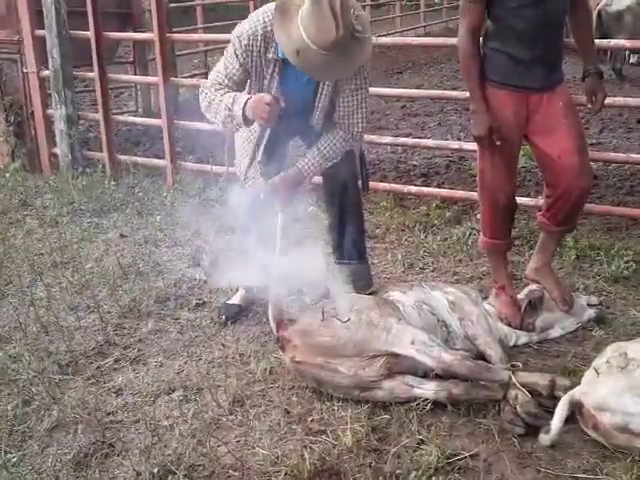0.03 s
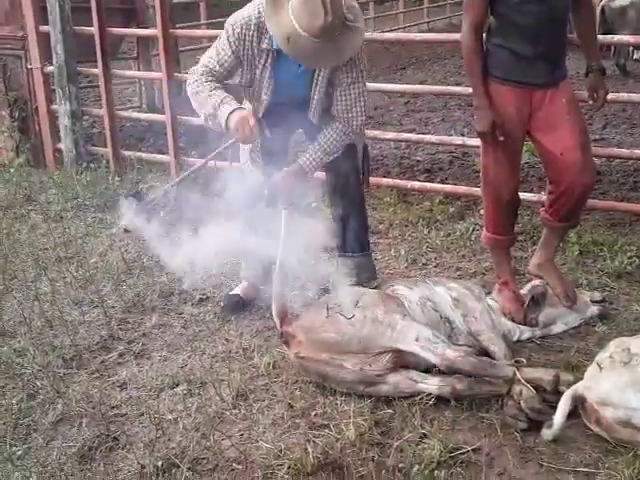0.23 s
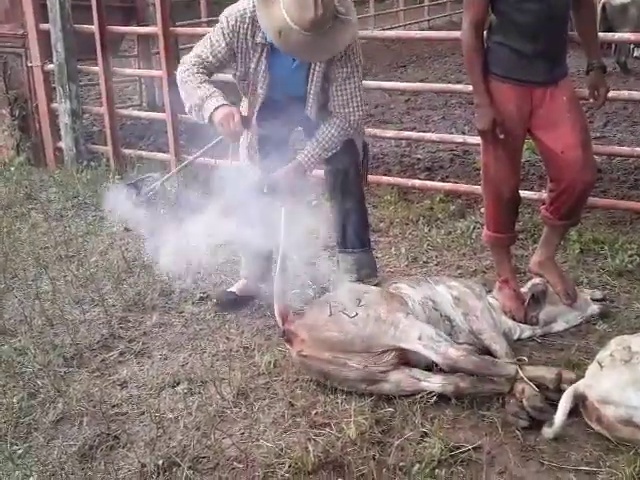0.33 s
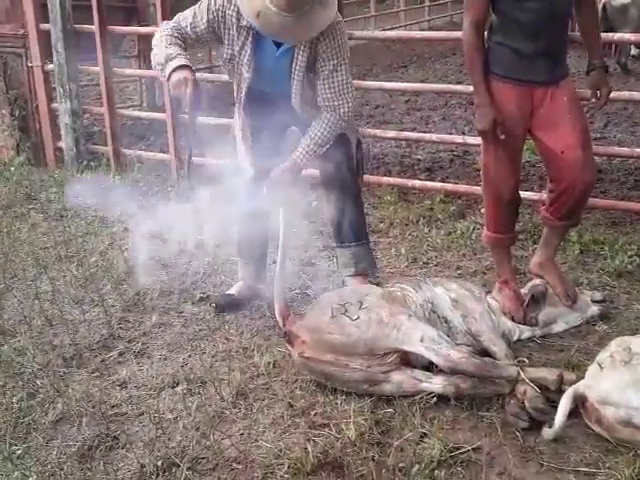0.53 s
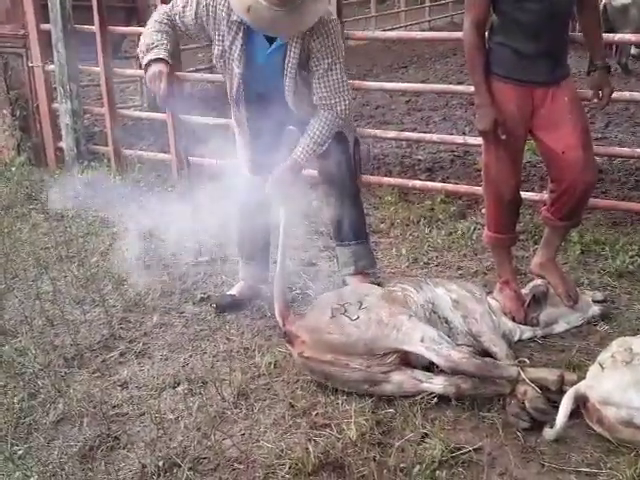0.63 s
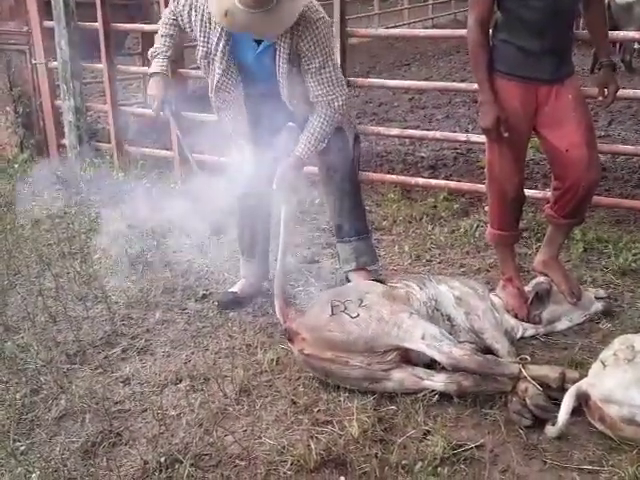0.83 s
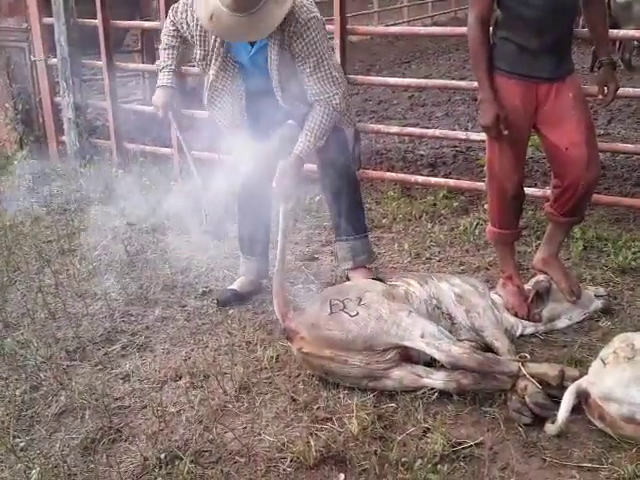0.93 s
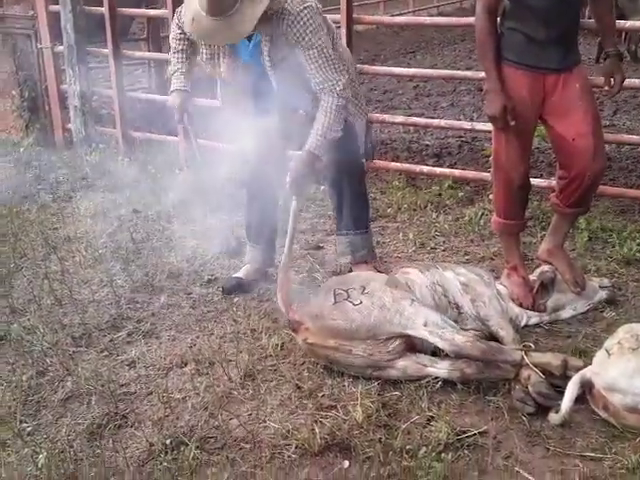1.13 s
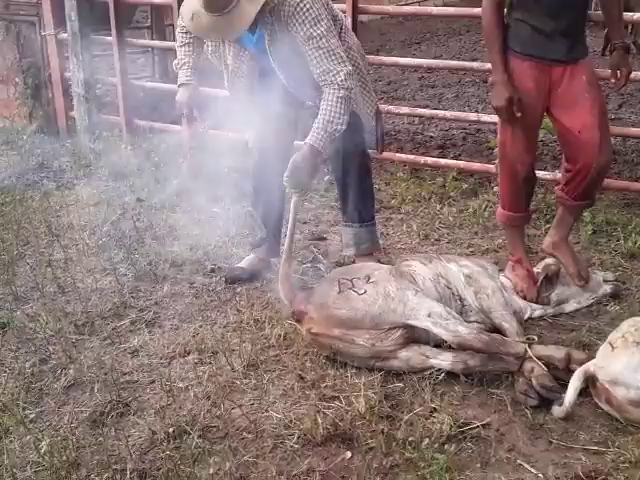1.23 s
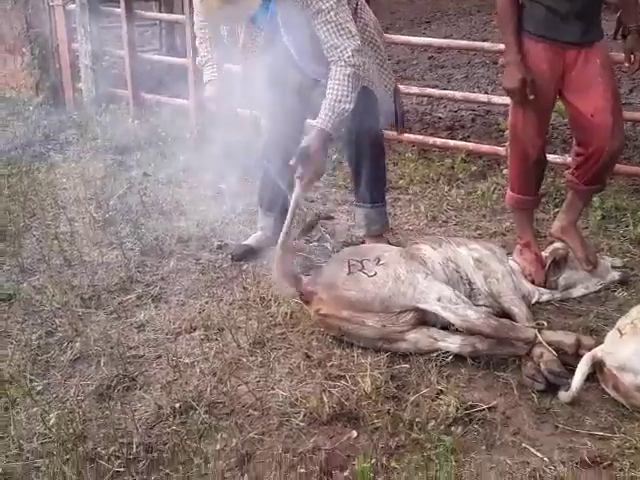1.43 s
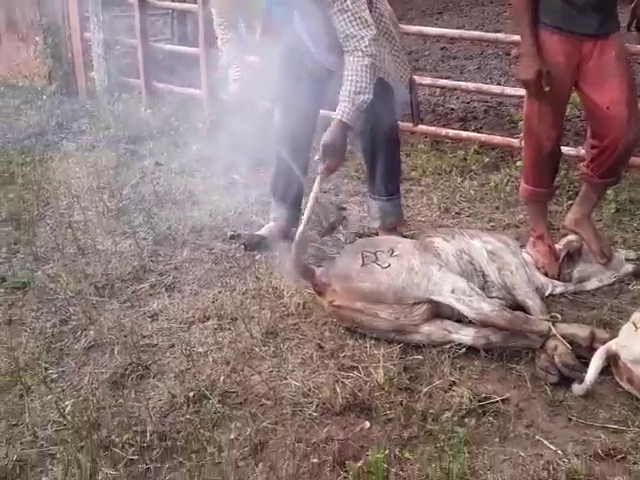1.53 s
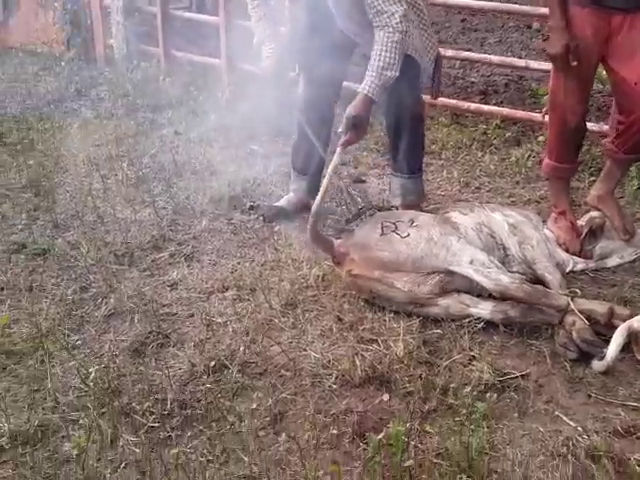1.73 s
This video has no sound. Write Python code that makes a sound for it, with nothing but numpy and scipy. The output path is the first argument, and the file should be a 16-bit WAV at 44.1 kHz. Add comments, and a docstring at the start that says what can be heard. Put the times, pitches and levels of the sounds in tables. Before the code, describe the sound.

A low, raspy bellow from a nearby cow climbs and breaks off, followed by a short, softer groan. Behind it, the open-air livestock pen holds a steady low rumble and hiss, with thin chirps and a faint passing sizzle.

```python
"""A cow held down in an outdoor pen bellows twice: a loud rising call, then a short low groan.
Slow snaps of the vocal folds ring the throat, whose lowest resonance climbs as the mouth opens;
air rasps after each snap. The pen answers faintly. Behind it sit thin bird chirps, rustles,
a brief sizzle and a steady bed: a low murmur of wind or machinery and a high hiss."""
import sys
import numpy as np
from scipy import signal
from scipy.fft import rfft, irfft
from scipy.io import wavfile
from scipy.ndimage import uniform_filter1d

SR = 44100
rng = np.random.default_rng(int(sys.argv[2]) if len(sys.argv) > 2 else 0)


def to_wav(s):
    """Save 16-bit WAV."""
    ch = np.atleast_2d(s).T  # columns
    pcm = np.round(np.clip(ch, -1, 1) * 32767)  # PCM
    wavfile.write(sys.argv[1], SR, pcm.astype(np.int16))


N = 79380

# Snap rate of the vocal folds: time_s, pitch_hz
BELLOW_PITCH = [(.182, 66.9), (.235, 81.9), (.28, 86), (.37, 98.3), (.44, 106.6), (.5, 110), (.56, 111.2),
                (.59, 99.5), (.645, 93.6)]
GROAN_PITCH = [(1.292, 70), (1.335, 70.3), (1.38, 77.7), (1.43, 77.1), (1.49, 75.7), (1.55, 75),
               (1.575, 60.5), (1.605, 60.7)]
# Fader rides of each call: time_s, effort_db, brightness_db, rasp_db
BELLOW_DYNAMICS = [(.18, -23.5, 1, -59), (.197, -17.5, 6, -45), (.24, -2.5, -0.5, -38.5),
                   (.29, -3, 1.5, -37), (.33, -4, 2, -34.5), (.39, -3, 3.5, -33.5), (.45, 1.5, 1.5, -38),
                   (.52, 1.5, 4, -33.5), (.565, -2.5, 5.5, -36.5), (.61, -4.5, 2, -33.5),
                   (.64, -43, 14, -41.5)]
GROAN_DYNAMICS = [(1.29, -35.5, -5, -77), (1.335, -20.5, -9, -50.5), (1.37, -15.5, 3.5, -46),
                  (1.402, -15, -18, -46), (1.417, -11.5, 1.5, -45.5), (1.49, -11, -11.5, -40.5),
                  (1.545, -17, 1.5, -44.5), (1.6, -31, 4, -52)]
# Three moving mouth formants: time_s, first_hz, first_db, second_hz, second_db, third_hz, third_db
BELLOW_MOUTH = [(.22, 394, -12, 740, 3.5, 975, 0.5), (.28, 417, 0, 660, -6, 895, 4.5),
                (.325, 460, -9, 675, 3.5, 950, 8), (.38, 519, 3.5, 770, 7, 972, 2),
                (.445, 543, 0, 768, 4, 790, 4), (.49, 677, 1, 713, 3, 898, -5),
                (.555, 670, 5.5, 770, 0, 890, -2), (.59, 444, 2, 780, 4.5, 858, 8.5),
                (.625, 375, 13, 780, -15, 890, -1)]
GROAN_MOUTH = [(1.35, 360, 4, 730, -1, 890, -1.5), (1.42, 394, -0.5, 725, 2.5, 900, -0.5),
               (1.49, 376, 4.5, 740, 3.4, 920, 3.5), (1.57, 400, 1.5, 760, 0.85, 902, 6)]
# Their bandwidths: first_hz, second_hz, third_hz
MOUTH_WIDTHS_HZ = [34.7, 124, 54]
# Steady body from chest, nose and mouth: centre_hz, width_hz, gain_db
BELLOW_BODY = [(98, 50, -11.5), (194.7, 54, -7), (320, 38, -12.5), (600, 280, -15.5)]
GROAN_BODY = [(150, 45, -6.5), (556, 180, -8.5), (4150, 480, -31.5), (5730, 330, -26)]
# Upper throat formants, the edge of the voice: centre_hz, width_hz, gain_db
UPPER_FORMANTS = [(1257, 330, -13.5), (1557, 106, -14.5), (2128, 69, -21), (2245, 95, -21), (2420, 43, -34),
                  (3790, 190, -32.5)]
# Colour of the rasping air: frequency_hz, gain_db
BELLOW_RASP_EQ = [(100, -18), (400, 8.5), (800, 20), (1500, -8.5), (1900, -1.5), (2300, 6), (2650, -2),
                  (2950, -14.5), (3500, -4.5), (4100, 0.5), (4800, -5.5), (5600, -3), (6600, -14.5),
                  (8000, -13), (9200, -28), (12000, -25.5), (15500, -28.5)]
GROAN_RASP_EQ = [(100, -12), (450, 10.5), (800, 20.5), (1100, 0), (1500, 5.5), (2000, -13), (2900, -13),
                 (4000, -1), (4900, -5.5), (5750, -4), (6600, -17), (8000, -11.5), (9200, -28),
                 (10500, -26.5), (11700, -18), (13000, -31), (15500, -25)]
# Wheezes that flare in the rasp: start_s, length_s, centre_hz, width_hz, level_db
WHEEZES = [(0.242, 0.084, 3830, 220, -43.5), (0.325, 0.058, 5600, 800, -46), (0.427, 0.13, 3240, 500, -37),
           (0.592, 0.09, 4400, 400, -45.5), (0.593, 0.09, 2594, 80, -39), (1.398, 0.008, 5700, 350, -40.5)]
# Falling bird chirps: start_s, length_s, from_hz, to_hz, level_db
CHIRPS = [(.7, 0.041, 6340, 4670, -45.5), (1.285, 0.098, 8200, 4140, -52),
          (1.686, 0.049, 6620, 4550, -53.5)]
# Soft rustles in the grass: start_s, length_s, centre_hz, width_hz, level_db
RUSTLES = [(0.052, 0.18, 3600, 1600, -55), (0.029, 0.26, 1000, 770, -49), (.822, 0.03, 4200, 1900, -53),
           (1.785, .03, 4900, 1700, -50)]
# Swell and fade of the sizzle: time_s, level_db
SIZZLE_ENVELOPE = [(.93, -83), (.98, -52.5), (1.04, -47.5), (1.08, -59), (1.2, -79)]
# Colour of the sizzle: frequency_hz, gain_db
SIZZLE_EQ = [(300, -20), (1200, 2), (4200, 2), (7000, -8), (9500, -20), (15000, -17)]
# Colour of the background bed: frequency_hz, gain_db
BED_EQ = [(25, -51), (50, -27), (80, -7.5), (120, -4.5), (250, -2.5), (370, -0.5), (450, -11), (650, -11.5),
          (780, -19.5), (1500, -18), (1900, -24), (3500, -26.5), (5800, -27.5), (6500, -21), (7050, -13.5),
          (7600, -24), (8050, -18.5), (9000, -43), (10500, -44), (13000, -39), (15500, -45)]
# Narrow bands in the bed: centre_hz, width_hz, level_db
BED_BANDS = [(334, 37, -50), (930, 25, -56), (1300, 29, -61.5), (1580, 150, -63), (2170, 33, -66),
             (3060, 39, -65)]

TIGHT_HZ, SLACK_HZ = 102, 72  # the folds beat evenly when tight, most unevenly when slack
SLAP_DELAY_S, SLAP_SCATTER_S, SLAP_DB = 0.00505, .0005, -8
FORMANT_SCATTER, SKIRT_WIDTHS = .04, 1.41
VOICE_LOW_CUT_HZ, VOICE_GAIN_DB = 237, 29
RASP_ATTACK_S, RASP_DECAY_S, RASP_SUSTAIN, RASP_GAIN_DB = 0.0002, 0.0043, 0.37, 9
ECHO_S, ECHO_DB = .0052, -28
TAIL_T60_S, TAIL_LOW_CUT_HZ, TAIL_DB = 0.27, 1100, -5
CHIRP_BLUR_HZ = 280
BED_DB, BED_WAVER_DB = -42.5, 1
LOW_CUT_HZ, HIGH_CUT_HZ = 65, 15720


def cow_call(pitch, dynamics, mouth, body, rasp_eq, jitter_s, shimmer_db):
    """A snap and a puff of air per fold cycle; slack folds slap again and shake the throat."""
    t = np.arange(N) / SR
    voiced = t[(t >= pitch[0][0]) & (t <= pitch[-1][0])]
    cycles = np.cumsum(curve(pitch, voiced)[0]) / SR
    snap_times = np.interp(np.arange(int(cycles[-1]) + 1), cycles, voiced)
    scatter = rng.standard_normal(size=(len(snap_times), 5))
    voice, puffs = np.zeros(2 * N), np.zeros(2 * N)
    pre_roll = 512  # samples ahead of each snap
    for at, (late, accent, slap_late, *shake) in zip(snap_times, scatter):
        effort_db, bright_db, _ = curve(dynamics, at)
        slack = np.clip((TIGHT_HZ - curve(pitch, at)[0]) / (TIGHT_HZ - SLACK_HZ), 0, 1)
        formants = curve(mouth, at)
        centres = formants[::2] * (1 + slack * FORMANT_SCATTER * np.r_[0, shake])
        upper = [(hz, width, db + bright_db) for hz, width, db in UPPER_FORMANTS]
        f, spectrum = throat([*body, *zip(centres, MOUTH_WIDTHS_HZ, formants[1::2]), *upper])
        delay = lambda s: np.exp(-2j * np.pi * f * s)
        slap = slack * undb(SLAP_DB) * delay(SLAP_DELAY_S + SLAP_SCATTER_S * slap_late)
        start = int(at * SR) - pre_roll
        snap = irfft(spectrum * (1 + slap) * delay(at + jitter_s * late - start / SR))
        span = slice(start, start + len(snap))
        voice[span] += snap * undb(VOICE_GAIN_DB + effort_db + shimmer_db * accent)
        age = np.maximum(np.arange(len(snap)) - pre_roll, 0) / SR
        puffs[span] += (1 + slack) * (1 - np.exp(-age / RASP_ATTACK_S)) * np.exp(-age / RASP_DECAY_S)
    breath = uniform_filter1d(1. * ((t >= voiced[0]) & (t <= voiced[-1])), size=512)
    rasp_gain = undb(RASP_GAIN_DB + curve(dynamics, t)[-1])
    rasp = noise(rasp_eq) * (puffs[:N] + RASP_SUSTAIN * breath) * rasp_gain
    return voice[:N] + rasp


def throat(resonances, size=4096):
    """Spectrum of one snap: the folds part gently, slam shut and the throat rings."""
    f = np.fft.rfftfreq(size, 1 / SR)
    power = sum(resonance(f, hz, width) * undb(db) ** 2 for hz, width, db in resonances)
    cepstrum = irfft(np.log(power) / 2)
    # Minimum phase keeps the attack sharp, with all the ringing after it.
    causal = np.r_[1, np.full(size // 2 - 1, 2), np.zeros(size // 2)]
    ringing = np.exp(rfft(cepstrum * causal))
    return f, ringing * 1j * f / (1j * f - VOICE_LOW_CUT_HZ)


def noise_flares(table):
    """Wheezes or rustles: bands of noise that swell quickly and fade."""
    t, out = np.arange(N) / SR, 0
    for at, length, hz, width, db in table:
        progress = np.clip((t - at) / length, 0, 1)
        out = out + undb(db) * np.sin(np.pi * np.sqrt(progress)) * band(hz, width)
    return out


def pen(sound):
    """Adds one near reflection and a short tail from the rails, which scatter little bass."""
    t = np.arange(SR // 2) / SR
    tail = rng.standard_normal(len(t)) * np.exp(-np.log(1000) * t / TAIL_T60_S) * (t > ECHO_S)
    low_cut = signal.butter(2, TAIL_LOW_CUT_HZ, "high", fs=SR, output="sos")
    tail = signal.sosfilt(low_cut, tail / np.linalg.norm(tail))
    echo = np.interp(np.arange(N) - ECHO_S * SR, np.arange(N), sound, left=0)
    return sound + undb(ECHO_DB) * echo + undb(TAIL_DB) * signal.fftconvolve(sound, tail)[:N]


def bird():
    """Thin far chirps that fall fast, blurred by distance."""
    t, out = np.arange(N) / SR, 0
    for at, length, from_hz, to_hz, db in CHIRPS:
        progress = np.clip((t - at) / length, 0, 1)
        phase = 2 * np.pi * np.cumsum(from_hz * (to_hz / from_hz) ** progress) / SR
        envelope = np.sqrt(np.abs(np.sin(np.pi * progress)))
        out = out + undb(db) * envelope * np.sin(phase) * band(0, CHIRP_BLUR_HZ)
    return out


def sizzle():
    """A soft sizzle of noise that swells and passes."""
    t = np.arange(N) / SR
    gate = (t > SIZZLE_ENVELOPE[0][0]) * (t < SIZZLE_ENVELOPE[-1][0])
    return noise(SIZZLE_EQ) * undb(curve(SIZZLE_ENVELOPE, t)[0]) * gate


def background_bed():
    """Steady murmur of wind or machinery and a high hiss, with narrow bands that waver."""
    bed = undb(BED_DB) * noise(BED_EQ)
    for hz, width, db in BED_BANDS:
        bed += undb(db) * band(hz, width) * undb(BED_WAVER_DB * band(hz=3, width=6.7))
    return bed


def noise(eq):
    """Noise at rms 1, coloured by an EQ curve."""
    hz, db = np.array(eq, float).T
    f = np.maximum(np.fft.rfftfreq(N, 1 / SR), 1)
    gain = undb(np.interp(np.log(f), np.log(hz), db))
    return unit_rms(irfft(rfft(rng.standard_normal(N)) * gain, N))


def band(hz, width):
    """Noise at rms 1 through one resonance."""
    gain = np.sqrt(resonance(np.fft.rfftfreq(N, 1 / SR), hz, width))
    return unit_rms(irfft(rfft(rng.standard_normal(N)) * gain, N))


def resonance(f, hz, width):
    """Power response of one peak with steep far skirts."""
    detune = (2 * (f - hz) / width) ** 2
    return 1 / (1 + detune) / (1 + detune / (2 * SKIRT_WIDTHS) ** 2)


def curve(table, t):
    """Each automation lane of a table at the times t."""
    times, *lanes = np.array(table, float).T
    return [np.interp(t, times, lane) for lane in lanes]


def undb(db):
    """Decibels to gain."""
    return 10 ** (np.asarray(db) / 20)


def unit_rms(x):
    """Scale to rms 1."""
    return x / np.sqrt(np.mean(x ** 2))


def scene():
    """Mono mix: cow and bird ring in the pen; bed, sizzle and rustles stay dry."""
    bellow = cow_call(BELLOW_PITCH, BELLOW_DYNAMICS, BELLOW_MOUTH, BELLOW_BODY, BELLOW_RASP_EQ,
                      jitter_s=.00003, shimmer_db=-0.9)
    groan = cow_call(GROAN_PITCH, GROAN_DYNAMICS, GROAN_MOUTH, GROAN_BODY, GROAN_RASP_EQ,
                     jitter_s=0.00029, shimmer_db=0.0)
    animals = pen(bellow + groan + noise_flares(WHEEZES) + bird())
    return (animals + background_bed() + sizzle() + noise_flares(RUSTLES))[None]


def record(dry):
    """The microphone drops the deepest bass; peaks stop at full scale and the top is cut steeply."""
    low_cut = signal.butter(2, LOW_CUT_HZ, "high", fs=SR, output="sos")
    high_cut = signal.ellip(10, .2, 80, HIGH_CUT_HZ, fs=SR, output="sos")
    thinned = signal.sosfiltfilt(low_cut, dry)
    return signal.sosfilt(high_cut, np.clip(thinned, -1, 1))


dry = scene()
out = record(dry)
to_wav(out)
```